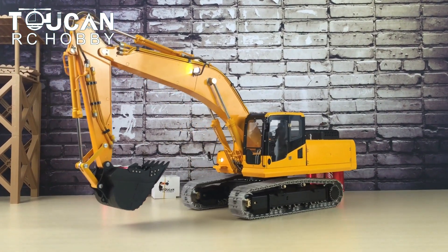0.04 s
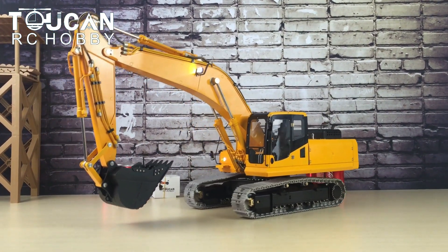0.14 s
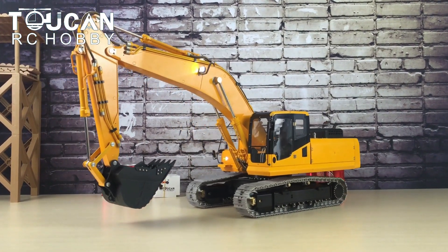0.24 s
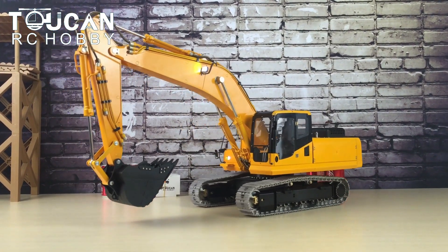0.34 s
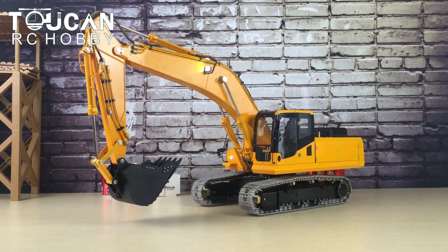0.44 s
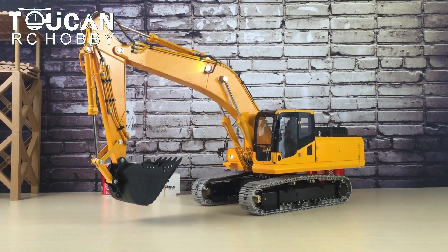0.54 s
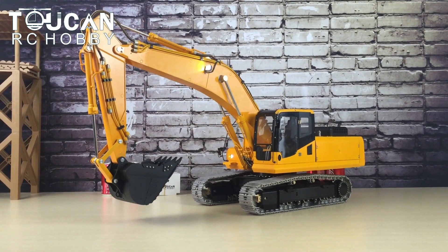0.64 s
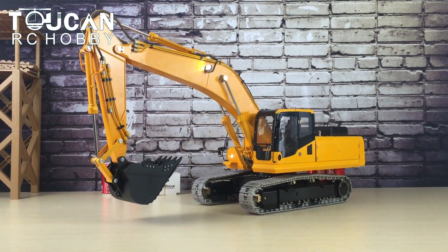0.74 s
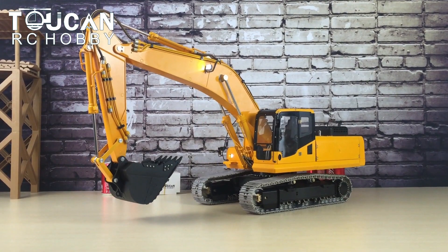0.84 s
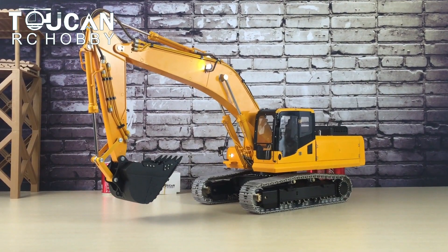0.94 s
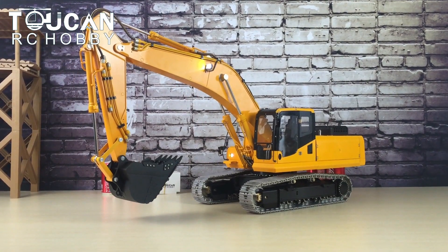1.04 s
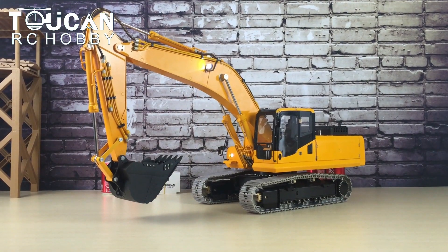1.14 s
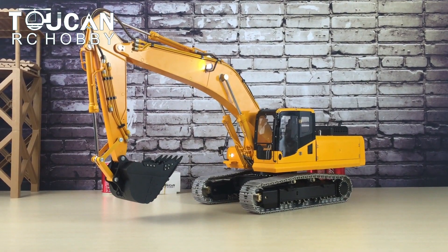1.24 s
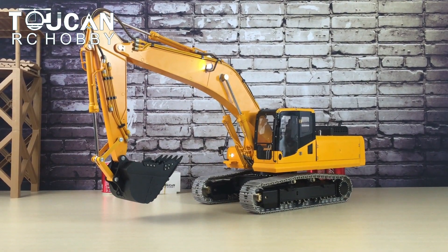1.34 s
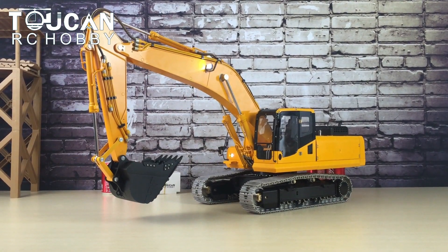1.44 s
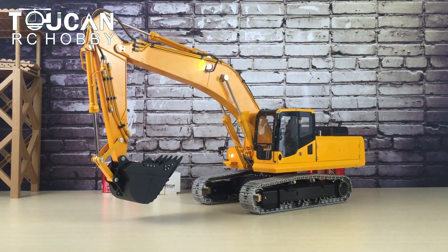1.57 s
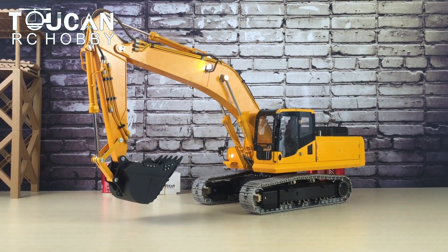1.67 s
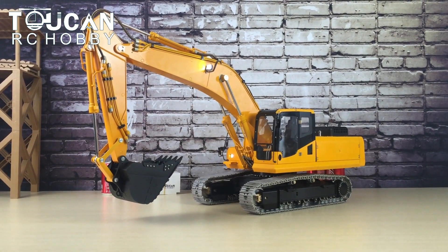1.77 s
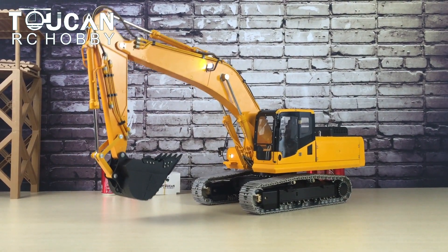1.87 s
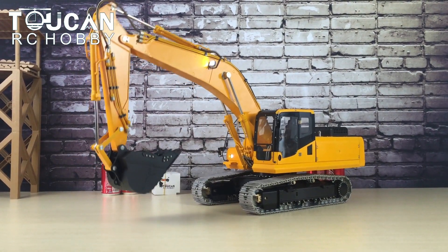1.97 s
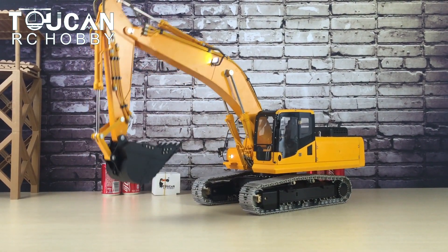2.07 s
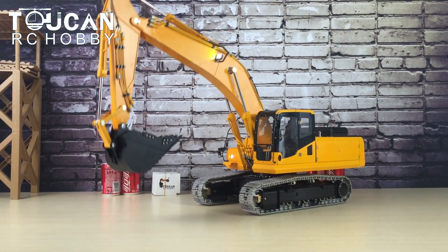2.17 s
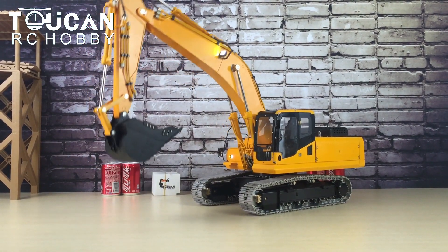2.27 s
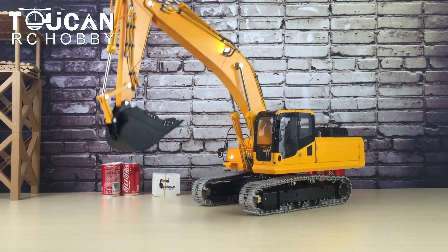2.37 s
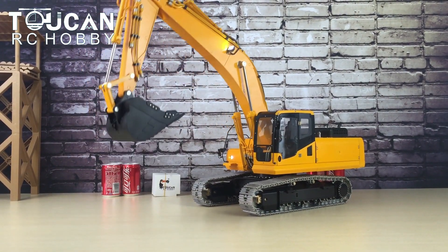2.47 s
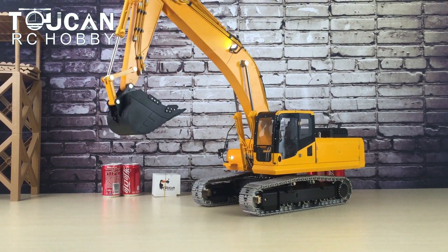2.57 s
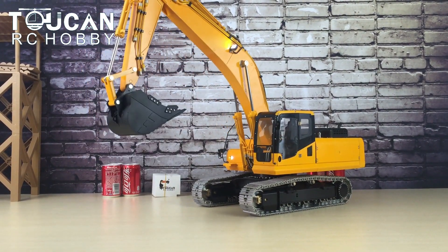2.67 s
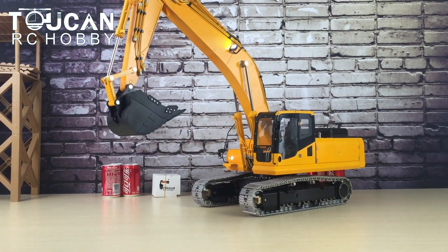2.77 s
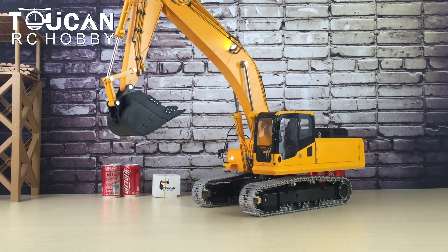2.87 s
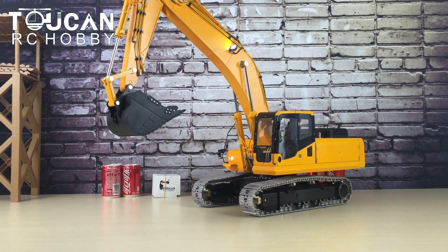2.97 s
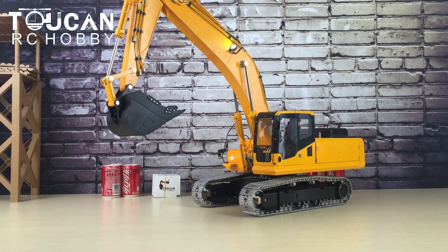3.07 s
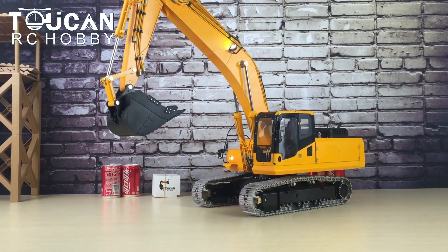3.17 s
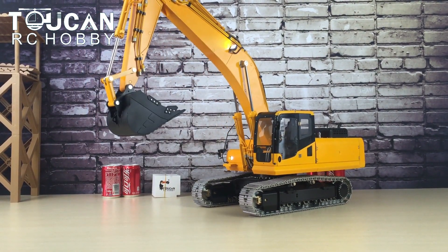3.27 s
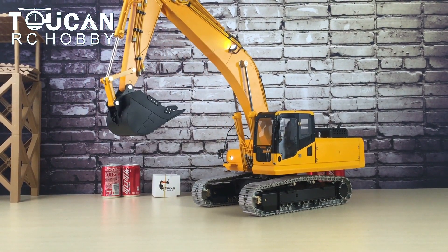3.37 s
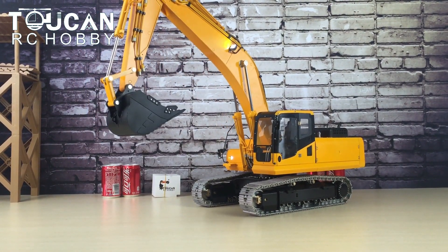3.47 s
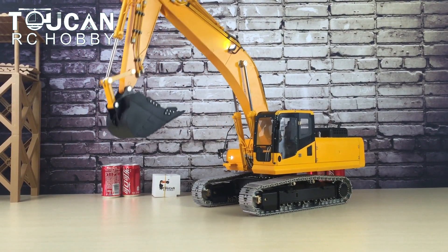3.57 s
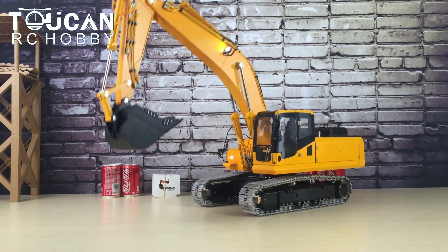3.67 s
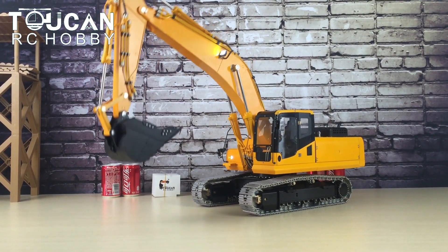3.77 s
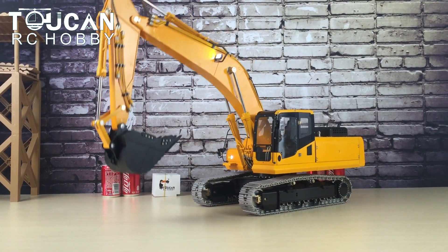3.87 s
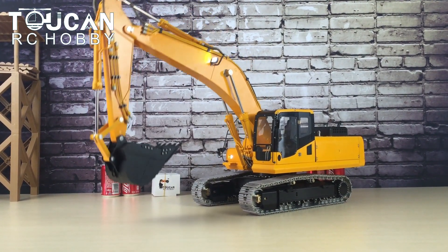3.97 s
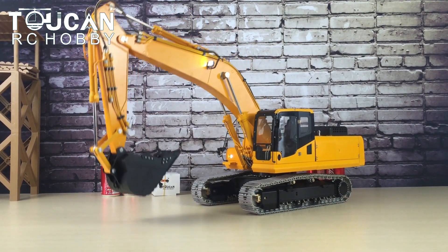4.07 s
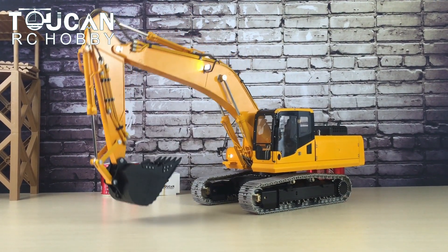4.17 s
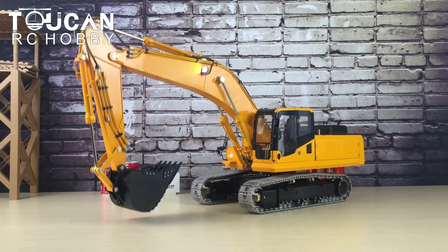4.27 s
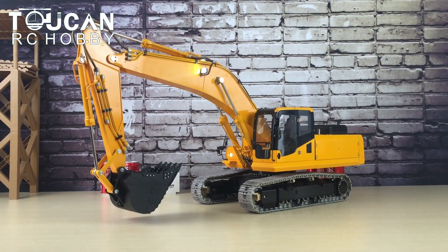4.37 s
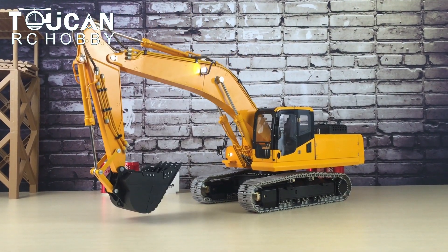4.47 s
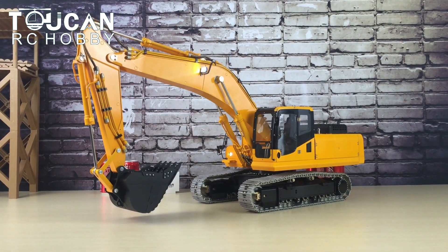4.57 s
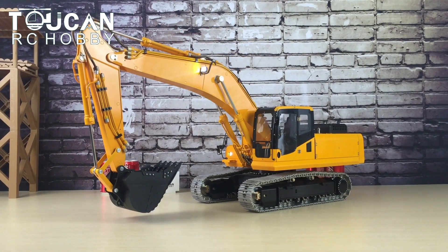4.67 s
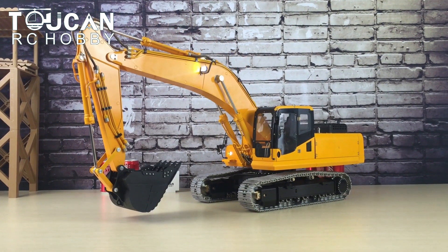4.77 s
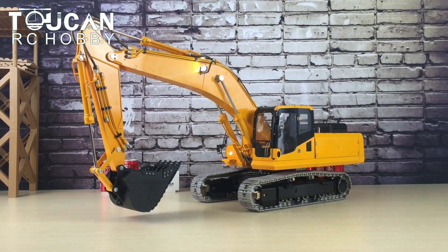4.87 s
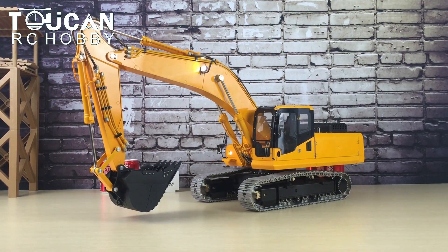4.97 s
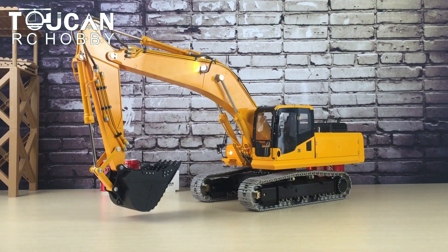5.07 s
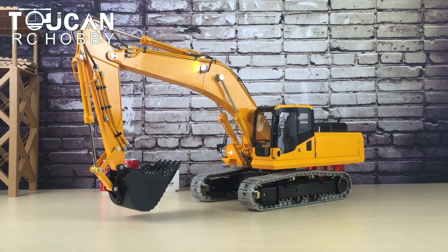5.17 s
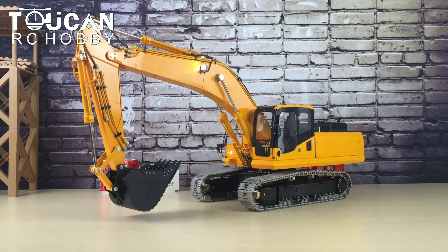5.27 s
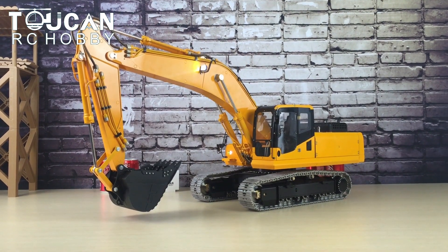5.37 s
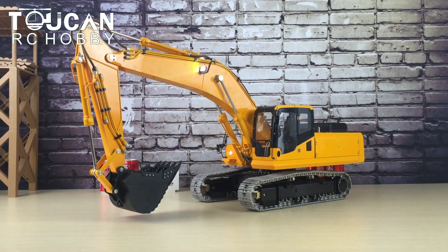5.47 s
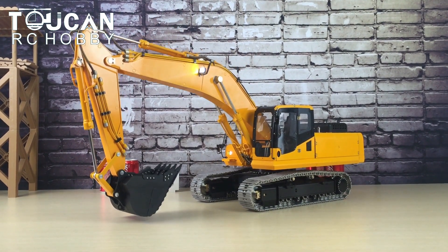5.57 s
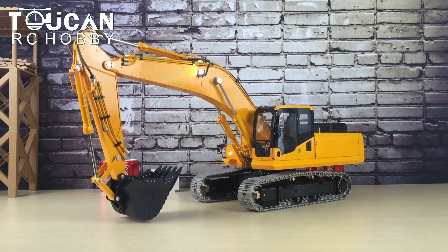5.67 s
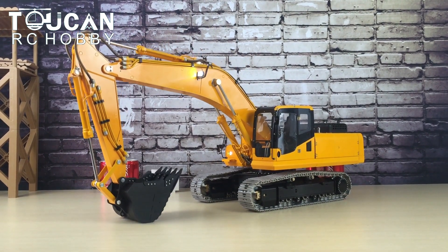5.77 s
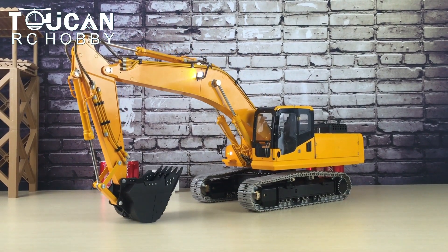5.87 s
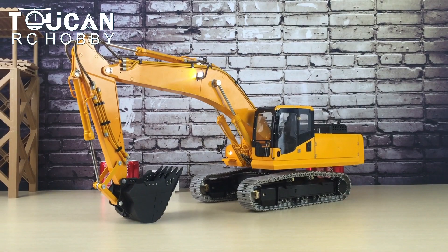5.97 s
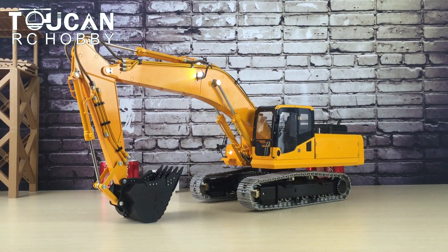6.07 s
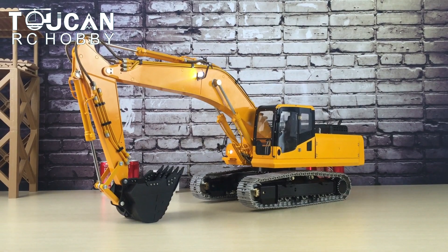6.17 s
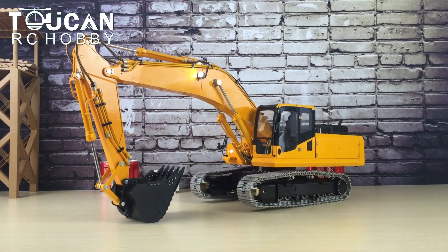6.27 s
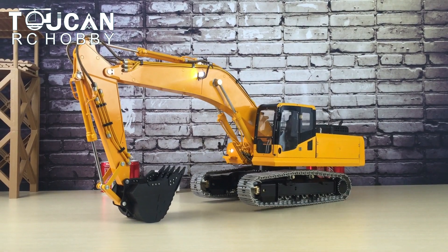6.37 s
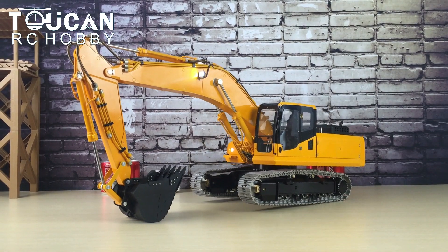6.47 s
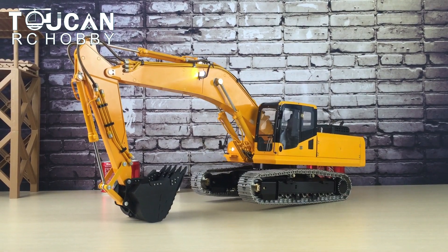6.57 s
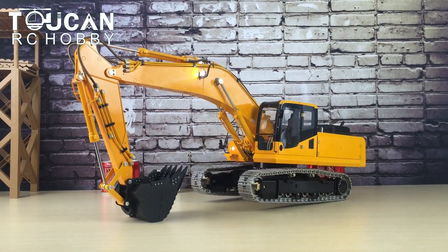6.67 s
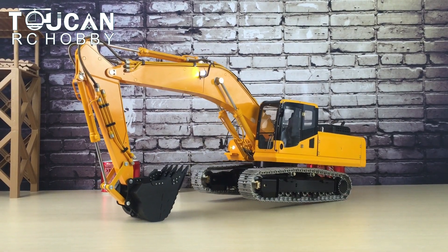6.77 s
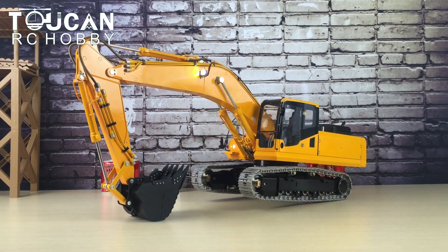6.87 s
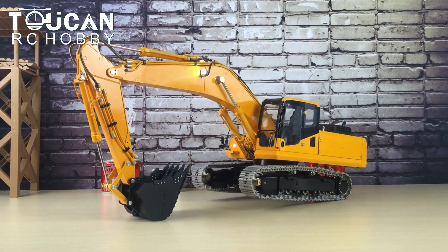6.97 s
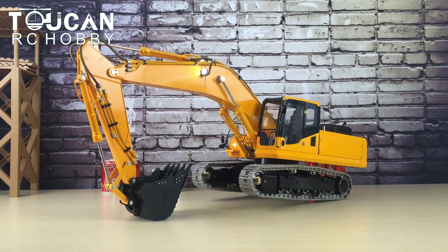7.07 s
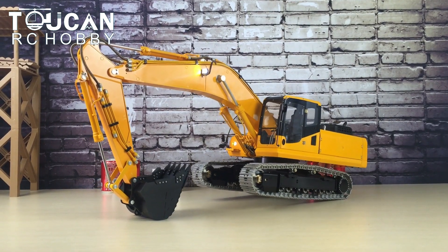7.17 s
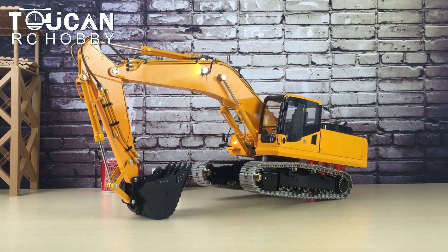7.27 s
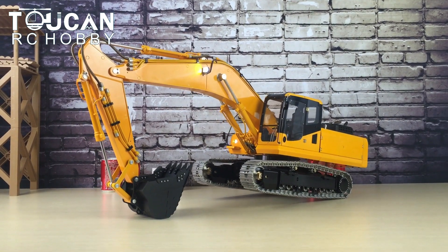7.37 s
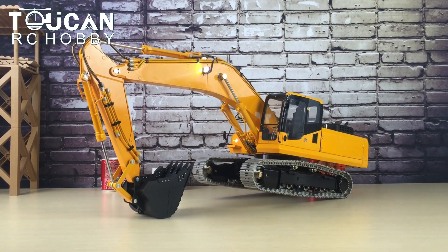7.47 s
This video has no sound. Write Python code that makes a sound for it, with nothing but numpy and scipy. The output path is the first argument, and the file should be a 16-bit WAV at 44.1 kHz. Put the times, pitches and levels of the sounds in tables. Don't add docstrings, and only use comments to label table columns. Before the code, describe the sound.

A model excavator's slewing gear rattles to a clunking stop, then its pump motor whines in three bursts over ventilation hum, the bucket finally thumping the table.

```python
import sys
import numpy as np
from scipy import signal
from scipy.fft import rfft, irfft, next_fast_len
from scipy.io import wavfile
from scipy.ndimage import uniform_filter1d, minimum_filter1d, map_coordinates

SR = 44100
rng = np.random.default_rng(int(sys.argv[2]) if len(sys.argv) > 2 else 0)


def master(y):
    cut = np.clip(np.atleast_2d(y).T, -1, 1)
    pcm = np.round(cut * 32767)
    wavfile.write(sys.argv[1], SR, pcm.astype(np.int16))


def undo_db(level):
    steps = np.asarray(level, float) / 20
    return 10 ** steps


N = 331632
TIME = np.arange(N) / SR
REFERENCE_SPEED_HZ = 295


def unit(x):
    return x / np.sqrt(np.mean(x ** 2) + 1e-20)


def along(points, hz):
    f, v = np.transpose(points)
    return np.interp(np.log(hz + 1), np.log(f + 1), v)


def wobble(rate):
    steps = np.arange(0, N + 64, 64) / SR
    knots = rng.standard_normal(int(N * rate / SR) + 4)
    return np.interp(TIME, steps, map_coordinates(knots, [steps * rate]))


def noise():
    return rng.standard_normal(N)


def peak(hz, centre, width):
    return 1 / (1 + (2 * (hz - centre) / width) ** 2)


def coloured(x, spectrum, modes=()):
    m = 2 ** 14
    f = np.fft.rfftfreq(m, 1 / SR)
    power = 1 + sum(undo_db(2 * db) * peak(f, c, w) for c, w, db in modes)
    cep = irfft(np.log(undo_db(along(spectrum, f)) * np.sqrt(power) + 1e-6), m)
    cep[1:m // 2] *= 2
    cep[m // 2 + 1:] = 0
    return signal.oaconvolve(x, irfft(np.exp(rfft(cep)), m))[:N]


# (frequency [Hz], level [dB per Hz])
RUMBLE = [(13, -12), (22, -10), (127, -4.5), (219, -9.5), (252, -8), (350, -25.5), (380, -20), (542, -30),
          (732, -21), (1450, -33), (1810, -31.5), (2440, -39.5), (15300, -58)]
# (frequency [Hz], width [Hz], level [dB])
DUCT_MODES = [(43, 23, 7), (80.4, 6, 7), (125.6, 4.5, 7), (167, 37, -6), (237.6, 9.7, -2), (720, 770, 0),
              (2250, 96, 5.5)]
# (frequency [Hz], level [dB])
FAN_BLADE = (250, -53.5)


def air():
    hz, db = FAN_BLADE
    blade = 1.27 * undo_db(db + 4.0 * wobble(3.0)) * np.sin(2 * np.pi * hz * TIME + 4.6 * wobble(4))
    rumble_db = -44.5 + 0.8 * wobble(3.05)
    return undo_db(rumble_db) * unit(coloured(noise(), RUMBLE, DUCT_MODES)) + blade


# (frequency [Hz], time [s])
ECHO_T60 = [(150, 0.47), (1000, 0.51), (4000, 0.37), (12000, 0.19)]


def room(x):
    hz, t, z = signal.stft(rng.standard_normal(SR // 2), SR, nperseg=256)
    fading = z * undo_db(-60 * t / along(ECHO_T60, hz)[:, None])
    tail = signal.istft(fading, SR, nperseg=256)[1]
    late = np.pad(x, (300, 0))
    return signal.fftconvolve(late, tail / np.linalg.norm(tail))[:N]


# (frequency [Hz], width [Hz], level [dB])
TABLE_MODES = [(140, 63, 0), (208, 52, 7.5), (302, 76, 0.5), (396, 99, -1)]


def on_table(x):
    m = next_fast_len(N + SR // 2)
    f = np.fft.rfftfreq(m, 1 / SR)
    response = sum((-1) ** k * undo_db(db) * 1j * f * w / (c * c - f * f + 1j * f * w)
                   for k, (c, w, db) in enumerate(TABLE_MODES))
    return irfft(rfft(x, m) * response, m)[:N]


# (time [s], peak [dB], tone [Hz], time to die by 60 dB [s])
SHOVES = [
    (0.044, -29, 140, 0.079),
    (0.149, -26, 142, 0.19),
    (0.493, -24, 131, 0.14),
    (0.523, -39, 152, 0.12),
    (1.755, -38.5, 214, 0.52),
    (3.554, -20.5, 159, 0.099),
    (3.587, -22.5, 174, 0.095),
    (4.798, -27, 197, 0.16),
    (5.871, -18, 255, 0.14),
    (5.879, -23, 277.4, 0.22),
]


def thumps():
    shake, tone, t = np.zeros(N + SR), np.zeros(N + SR), np.arange(SR // 3) / SR
    for s, db, hz, t60 in SHOVES:
        swell = undo_db(db - 60 * t / t60) * (1 - np.exp(-t / 0.0017))
        shake[round(s * SR):][:len(t)] += swell * rng.standard_normal(len(t))
        tone[round(s * SR):][:len(t)] += swell * np.sin(2 * np.pi * hz * t)
    return undo_db(12.5) * on_table(shake[:N]) + 0.89 * tone[:N]


# (time [s], peak [dB], upper ring [dB], bucket ring [dB], crack [dB])
CONTACTS = [(0.052, -24.5, -18, -22, -15), (0.152, -21, 4, -22, -12), (0.414, -38.5, 6, -1, -17),
            (0.428, -41, -1, -10, -6), (0.493, -25.5, -2, -16, -10), (1.718, -32.5, -13.5, -28, -20),
            (3.515, -34.5, -3, -36, -12), (3.54, -25, -1.5, -20, -12), (3.553, -21.5, 4, -20, -2.5),
            (3.604, -28.5, 1.5, -30, -22), (4.755, -38, -12, -30, -8), (4.782, -32.5, 3.5, -20, -4),
            (5.872, -15.5, -21, -22, -10.5), (5.881, -18, -31, -18, -9)]
# (frequency [Hz], size)
BUCKET_TONES = [(3240, 1), (3370, .6), (3540, .45), (2900, .4)]
# (frequency [Hz], width [Hz], level over the broad response [dB])
HOUSING_MODES = [(1011, 89, 8.5), (1213, 80, 8), (1394, 34, 10.5), (1761, 135, 10), (2015, 64, 9),
                 (2336, 117, 6.5), (3260, 31, -10), (4520, 46, 7.5)]


def clunks():
    out, t = np.zeros((4, N + SR)), np.arange(SR // 4) / SR
    for s, db, upper_db, bucket_db, crack_db in CONTACTS:
        low, upper, crack, rattle = rng.standard_normal((4, len(t)))
        decay = undo_db(-60 * t / 0.033) + 0.57 * undo_db(-60 * t / 0.13)
        chatter = decay * (1 - np.exp(-t / 0.0024))
        bucket = sum(size * undo_db(rng.normal(0, 1.5)) * np.sin(2 * np.pi * hz * t)
                     for hz, size in BUCKET_TONES)
        bucket = bucket * (1 + 0.5 * uniform_filter1d(rattle, size=12))
        rows = [chatter * low, undo_db(upper_db) * chatter * upper, undo_db(crack_db) * chatter * crack,
                0.76 * undo_db(bucket_db - 60 * t / 0.15) * bucket]
        out[:, round(s * SR):][:, :len(t)] += undo_db(db) * np.array(rows)
    low, upper, crack, bucket = out[:, :N]
    dull = [(250, -18.5), (500, 0.5), (900, -2.5), (1350, -2.5), (2000, -8), (5000, -58)]
    ring = [(900, -55), (1600, 4), (2400, -9.0), (3600, -5.5), (7000, -33)]
    bright = [(2500, -50), (4500, -9.5), (7000, -5.5), (12000, -9.5), (15500, -15)]
    metal = coloured(low, dull, HOUSING_MODES) + coloured(upper, ring, HOUSING_MODES)
    return undo_db(5.5) * metal + undo_db(1.5) * coloured(crack, bright) + bucket


# (frequency [Hz], level [dB per Hz])
PIN_SHIVER = [(1500, -34), (2100, -2), (2900, 7), (3500, 1.5), (3900, -22), (4700, -9), (6000, -46)]


def settle():
    since = TIME - 0.495
    shape = (since > 0) * undo_db(-32.5 - 60 * np.abs(since) / 0.23 + 2.3 * wobble(59.6))
    return shape * unit(coloured(noise(), PIN_SHIVER))


# (time [s], gear level [dB], table level [dB])
GEAR_JOLTS = [
    (0.067, -21.5, -34.5),
    (.156, -26.5, -42),
    (.215, -38, -51),
    (.434, -32.5, -67),
    (.5, -26.5, -37.5),
    (0.547, -59, -30.5),
]
# (frequency [Hz], level [dB per Hz])
GEAR_RATTLE = [(240, -28), (400, -4), (922, -11), (1030, -11), (1710, -10), (1850, -11.5), (2280, -13),
               (3500, -15.5), (4550, -21.5), (7700, -120)]
# (frequency [Hz], level [dB per Hz])
GEAR_HISS = [(1470, -32), (2500, -7.5), (5280, -7.5), (5920, -8), (10200, -23.5), (13800, -20),
             (15500, -19)]


def slew():
    stop_s, fade_s = 0.506, 0.014
    turning = 1 / (1 + np.exp(np.clip((TIME - stop_s) / (fade_s / 2), -50, 50)))

    def jolt(s):
        rise_s, fall_s = 0.022, 0.017
        return np.exp(np.minimum((TIME - s) / rise_s, (s - TIME) / fall_s))

    teeth = noise() * undo_db(1.9 * wobble(251.2))
    rattle = undo_db(-42.5) * turning + sum(undo_db(db) * jolt(s) for s, db, _ in GEAR_JOLTS)
    shake = undo_db(-47.5) * turning + sum(undo_db(db) * jolt(s) for s, _, db in GEAR_JOLTS)
    gear = undo_db(-7) * rattle * unit(coloured(teeth, GEAR_RATTLE, HOUSING_MODES))
    hiss = undo_db(-48 + 0.83 * wobble(15.4)) * turning * unit(coloured(teeth, GEAR_HISS))
    return gear + hiss + shake * unit(on_table(noise()))


# (time [s], half length [s], level [dB])
VALVE_SQUEAKS = [
    (1.71, 0.029, -70),
    (2.697, 0.041, -59),
    (4.54, .04, -70),
]


def servo():
    shape = sum(undo_db(db) * np.exp(-((TIME - s) / half) ** 2) for s, half, db in VALVE_SQUEAKS)
    band = [(5000, -61), (5550, 8), (5800, 2), (6050, 4), (6600, -50)]
    return shape * unit(coloured(noise(), band))


# (time [s], oil flow [dB], controller current [dB],
# hose pressure over the flow [dB])
BURST_EFFORT = [
    [(1.7, -47, -75, 0), (1.8, -40, -53.5, -2.5), (1.9, -38.5, -55.5, 7.5), (1.98, -34.5, -53, 2),
     (2.16, -38.5, -54, -5), (2.4, -35.5, -56, -4), (2.58, -38, -54.5, -12), (2.67, -43.5, -55.5, 4.5),
     (2.74, -47.5, -72, 6)],
    [(3.52, -46, -61, -12), (3.6, -43.5, -58, 4.5), (3.66, -35, -55.5, -2), (3.79, -35, -54.5, -9.5),
     (4.0, -36.5, -54.5, 4.5), (4.16, -34.5, -51.5, -9), (4.3, -39, -56, 3.5), (4.42, -44.5, -55.5, -4),
     (4.51, -47, -63.5, -8)],
    [(4.755, -41, -57.5, -1), (4.85, -41, -56, 5), (4.95, -37, -57, -7), (5.6, -36.5, -56, -3.5),
     (6.2, -35.5, -57, -3), (6.42, -36, -57, -2.5), (6.74, -35.5, -55.5, -7), (7.06, -36.5, -54.5, -12.5),
     (7.52, -36, -52.5, 4)],
]


def control(column, fade_db_per_s):
    switch_on_s = 0.021
    out = np.full(N, -120.)
    for rows in BURST_EFFORT:
        s, level = np.transpose(rows)[[0, column]]
        early = np.clip((s[0] + switch_on_s - TIME) / switch_on_s, 0, 4) ** 2
        fade = fade_db_per_s * np.clip(TIME - s[-1], 0, None)
        out = np.maximum(out, np.interp(TIME, s, level) - 25 * early - fade)
    return out


def current():
    inrush_db, inrush_s = 10.5, 0.024
    inrush = sum(np.exp(-((TIME - rows[0][0] - inrush_s) / (inrush_s / 2)) ** 2)
                 for rows in BURST_EFFORT)
    return control(column=2, fade_db_per_s=398) + inrush_db * inrush


# (time [s], speed [Hz])
BURST_SPEED = [
    [(1.71, 30), (1.86, 306), (1.94, 238), (2.09, 263), (2.19, 318), (2.27, 324), (2.55, 325), (2.64, 245),
     (2.72, 20)],
    [(3.53, 10), (3.6, 215), (3.65, 245), (3.765, 247), (3.795, 293), (4.0, 289), (4.15, 247), (4.27, 240),
     (4.5, 15)],
    [(4.76, 10), (4.84, 143), (5.18, 152), (5.36, 182), (5.55, 231), (5.7, 237), (6.16, 234), (6.31, 227.5),
     (7.52, 227.2)],
]


def field():
    inertia_s = 0.03
    speed = np.interp(TIME, *np.transpose(sum(BURST_SPEED, [])))
    speed = uniform_filter1d(speed, size=int(inertia_s * SR) + 1) * (1 + 0.0021 * wobble(25))
    return speed, 2 * np.pi * np.cumsum(speed) / SR


# (frequency [Hz], level [dB per Hz])
ROTOR_AIR = [(11500, -40), (12500, -6), (13400, -16), (14300, -6), (15200, -12), (16000, -32)]
# (multiple of the speed, mode [Hz], width [Hz], level over the current [dB])
SLOT_FLARES = [(15, 3545, 70, -4), (39, 10420, 200, -3), (40, 10730, 200, -1)]


def rotor(speed, turn):
    whipped = unit(coloured(noise(), ROTOR_AIR)) * (1 + 0.65 * np.cos(turn))
    flare = sum(undo_db(db) * np.sin(k * turn + 0.8 * wobble(90)) * peak(k * speed, hz, width)
                for k, hz, width, db in SLOT_FLARES)
    return undo_db(-70) * (speed / REFERENCE_SPEED_HZ) ** 5 * whipped + undo_db(current()) * flare


# (multiple of the speed, level [dB])
SIDE_TONES = [(-5, -24), (-4, -21), (-2, -7), (-1, 0), (-.283, -17), (.283, -19), (1, -3), (2, -12),
              (2.64, -26)]
# (frequency [Hz], level [dB])
BELL_RESPONSE = [(6800, -33), (7150, 11), (7400, -43), (7600, 4), (8300, 4.5), (8700, -35), (9000, -17)]


def whistle(speed, turn):
    carrier_hz = 8053.5
    level_db = current() + 0.5 * wobble(9.4)
    chop = 2 * np.pi * carrier_hz * TIME
    sides = sum(undo_db(db + 3.5 * wobble(9.1) + along(BELL_RESPONSE, carrier_hz + k * speed))
                * np.sin(chop + k * turn) for k, db in SIDE_TONES)
    carrier = 2 * undo_db(level_db - 7.5 + 0.8 * wobble(36)) * np.sin(chop)
    return 1.27 * undo_db(level_db) * sides + carrier


# (multiple of the speed, level [dB])
RIPPLE_TONES = [(1, -9), (3, 3), (4, -33), (4.5, -19), (5.3, -18), (6, -2.5), (6.9, -15), (9, -2),
                (10, -21.5), (12, -7.5)]
# (frequency [Hz], level [dB])
FRAME_RESPONSE = [(230, -6), (450, -8), (690, -15), (880, -7), (970, 0), (1100, 6), (1250, 1), (1360, -6),
                  (1600, -2), (1780, 10), (1950, 1.5), (2060, -1), (2450, -3), (2800, -20)]
# (frequency [Hz], width [Hz], extra gain)
SIDE_PANEL = (1412, 60, 2.8)
# (pump gear as multiple of the speed, mode [Hz], width [Hz], reach [Hz], noise share)
OIL_HOSE = (2.655, 603, 5.3, 34.5, 0.29)
# (frequency [Hz], level [dB])
SHELL_RESPONSE = [(150, -24.5), (300, -5.5), (700, -10), (1200, -4), (2000, 0.5), (2600, -9.5),
                  (3500, -14.5), (5000, -20), (7000, -78), (9000, -35)]
# (frequency [Hz], level [dB])
STATOR_RESPONSE = [(3000, -15.5), (4500, 0), (6500, -2.5), (9000, 3), (10000, -9), (12500, -11),
                   (13400, -11), (15200, -16)]
# (frequency [Hz], width [Hz], level [dB])
STATOR_RINGS = [(8100, 410, 11), (10050, 130, 9), (10340, 140, 18), (10760, 48, 25), (10440, 150, 15.5),
                (11500, 200, 10), (12500, 360, 4), (14000, 350, 3.5)]


def pump(speed, turn):
    flow_db = control(column=1, fade_db_per_s=220) + 1.96 * wobble(9)
    gear, hose_hz, hose_width, reach, share = OIL_HOSE

    panel_hz, panel_width, panel_gain = SIDE_PANEL
    sings = panel_gain * (1 + 0.6 * np.cos(turn / 11))
    ripple = np.zeros(N)
    for k, db in RIPPLE_TONES:
        hz = k * speed
        gain = 1 + sings * peak(hz, panel_hz, panel_width) + 1.5 * peak(hz, hose_hz, reach)
        tone_db = db + 2.5 * wobble(28) + along(FRAME_RESPONSE, hz)
        ripple += gain * undo_db(tone_db) * np.sin(k * turn + 0.36 * wobble(20))

    change = np.abs(np.gradient(uniform_filter1d(speed, size=4000))) * SR
    torque_db = 2.5 * np.tanh(change / 120)
    flow = noise() * (1 + 0.14 * np.cos(turn)) * undo_db(0.41 * wobble(30))
    body = undo_db(4.0) * coloured(undo_db(flow_db) * flow, SHELL_RESPONSE, HOUSING_MODES)
    body += undo_db(flow_db - 5.5 + torque_db) * ripple

    steps = 18 * np.exp(1500 * (np.cos(turn) - 1)) + 3.45 * noise()
    stator_db = current() - 12 + 0.25 * 20 * np.log10(speed / REFERENCE_SPEED_HZ)
    stator = coloured(undo_db(stator_db) * steps, STATOR_RESPONSE, STATOR_RINGS)

    hum = unit(coloured(noise(), [(hose_hz, -60)], [(hose_hz, hose_width, 60)]))
    gear_tone = 2.6 * peak(gear * speed, hose_hz, reach) * np.sin(gear * turn)
    hose = (gear_tone + share * hum) * undo_db(2.5 * wobble(12))
    s, _, _, pressure_db = np.transpose(sum(BURST_EFFORT, []))
    return body + stator + undo_db(flow_db - 2.5 + np.interp(TIME, s, pressure_db)) * hose


def scene():
    motor = field()
    machine = pump(*motor) + rotor(*motor) + servo() + slew() + settle() + clunks() + thumps()
    tone = whistle(*motor)
    echo = room(undo_db(-5.5) * machine + undo_db(-9.5) * tone)
    return (undo_db(-0.5) * machine + tone + echo + air())[None]


def roll_off(x):
    return signal.sosfilt(signal.butter(12, 15710, fs=SR, output="sos"), x)


# (frequency [Hz], level under the whistle [dB])
DROPOUT_LIMIT = [(4000, -70), (5000, -45), (6500, -45), (7300, -45), (8700, -33), (9350, -27), (9600, -43),
                 (11300, -44), (12200, -42), (13400, -42), (14400, -49), (15300, -48)]


def record(dry):
    hz, _, z = signal.stft(dry, SR, nperseg=1024)
    power = np.abs(z) ** 2
    loud = power[:, (hz > 7500) & (hz < 8500)].sum(axis=1, keepdims=True)
    loud = minimum_filter1d(loud, size=3, axis=2)
    drift = uniform_filter1d(rng.standard_normal(z.shape), size=2, axis=1)
    drift = uniform_filter1d(drift, size=14, axis=2)
    loud = loud * undo_db(2 * 4.5 * unit(drift) + 9)
    patch = uniform_filter1d(uniform_filter1d(power, size=3, axis=1), size=5, axis=2)
    heard = patch > loud * undo_db(2 * along(DROPOUT_LIMIT, hz))[:, None]
    mix = signal.istft(z * heard * (hz < 15340)[:, None], SR, nperseg=1024)[1][:, :N]
    mix = signal.sosfilt(signal.butter(8, 36, "high", fs=SR, output="sos"), mix)
    return roll_off(mix)


dry = scene()
out = record(dry)
master(out)
```